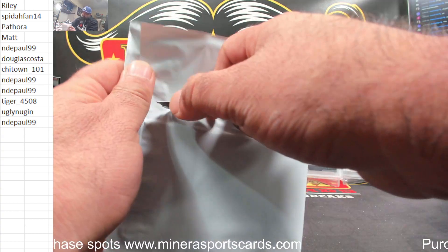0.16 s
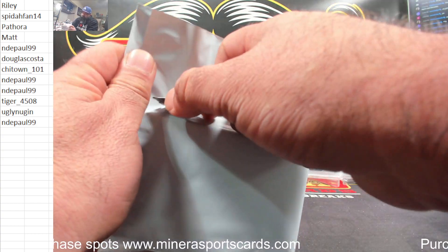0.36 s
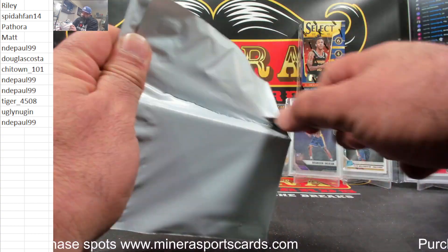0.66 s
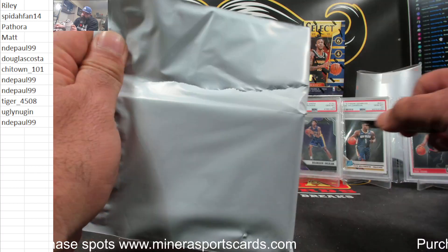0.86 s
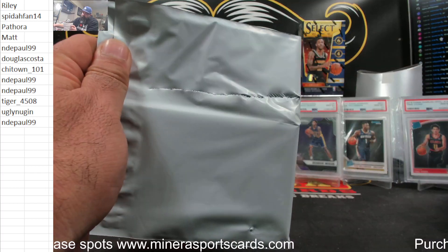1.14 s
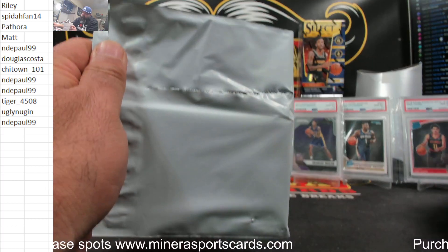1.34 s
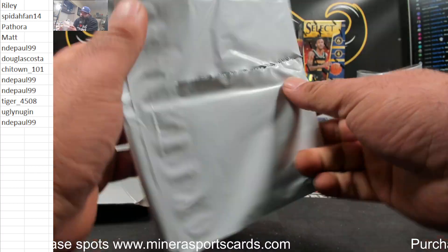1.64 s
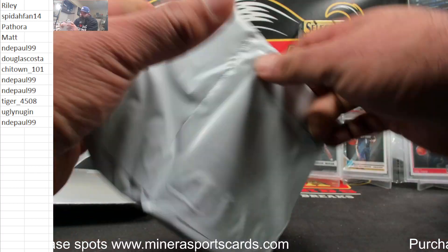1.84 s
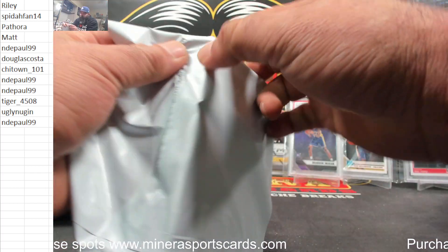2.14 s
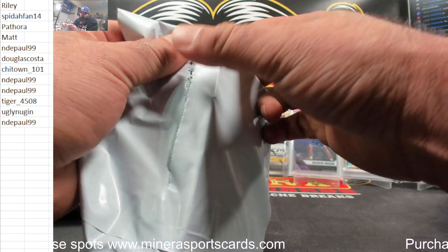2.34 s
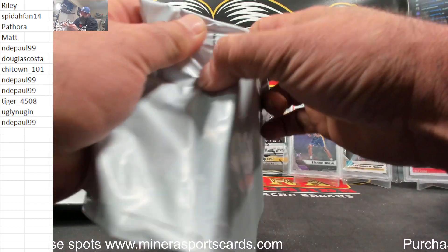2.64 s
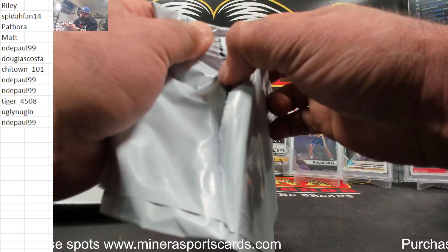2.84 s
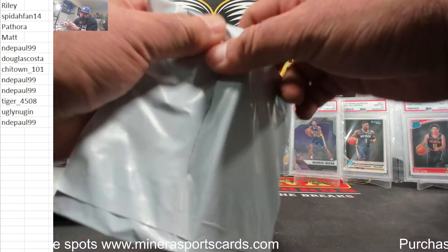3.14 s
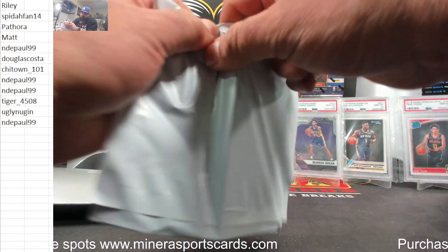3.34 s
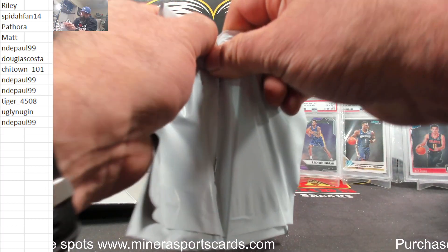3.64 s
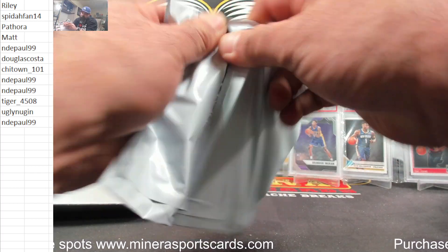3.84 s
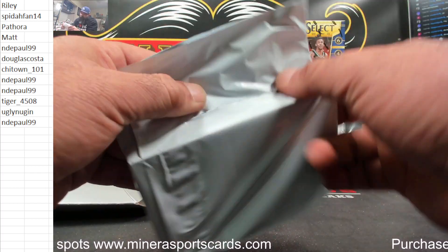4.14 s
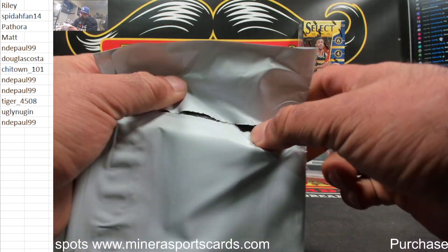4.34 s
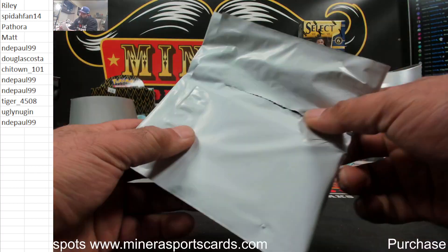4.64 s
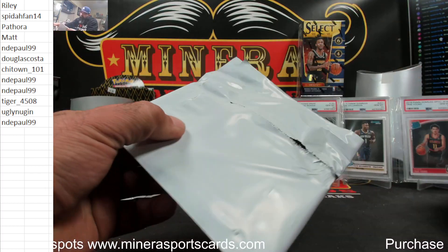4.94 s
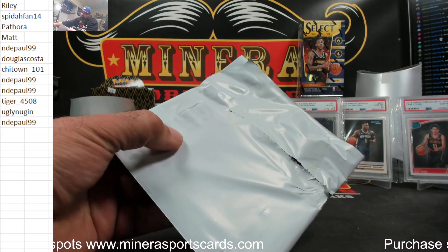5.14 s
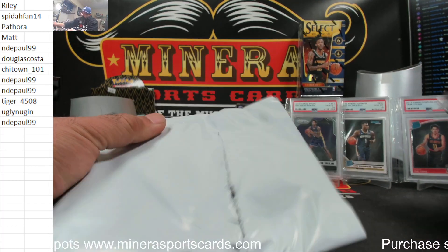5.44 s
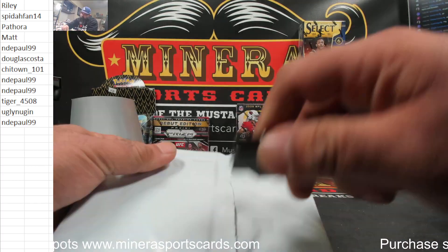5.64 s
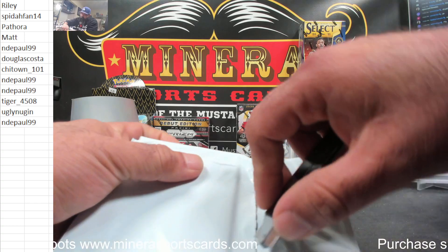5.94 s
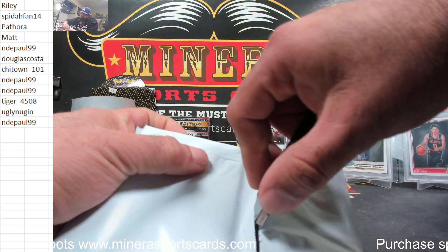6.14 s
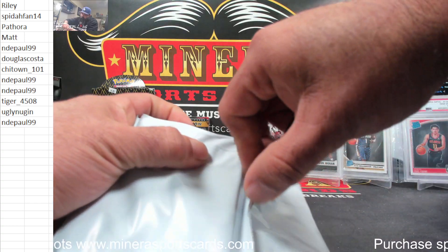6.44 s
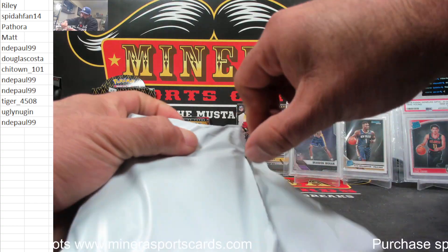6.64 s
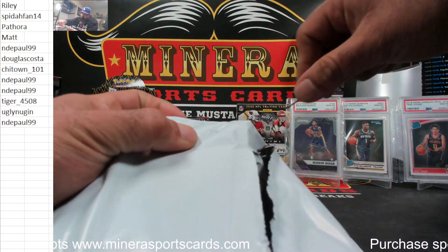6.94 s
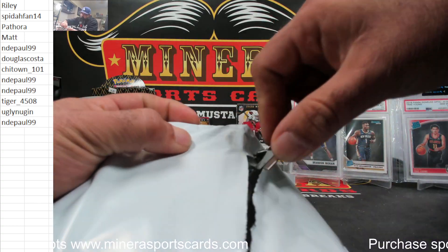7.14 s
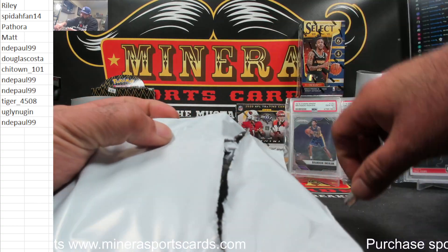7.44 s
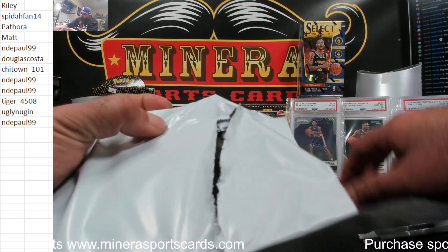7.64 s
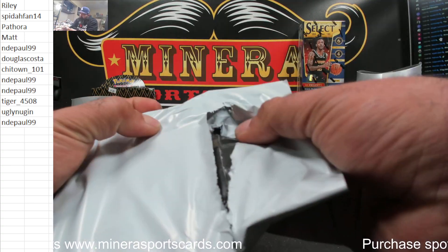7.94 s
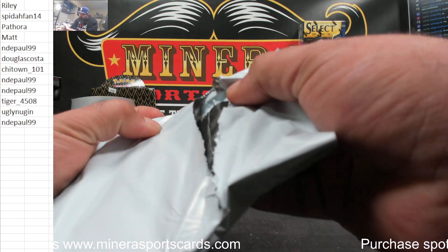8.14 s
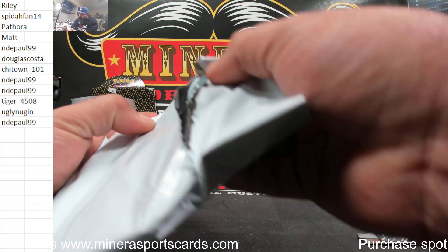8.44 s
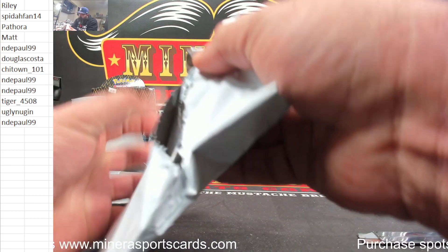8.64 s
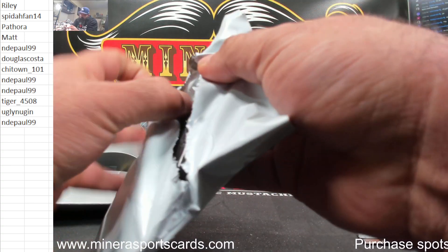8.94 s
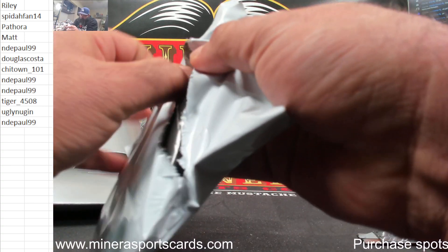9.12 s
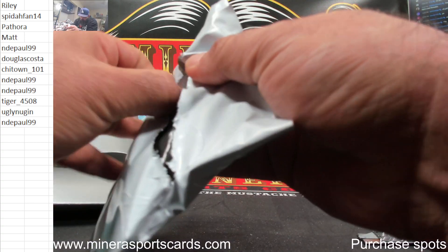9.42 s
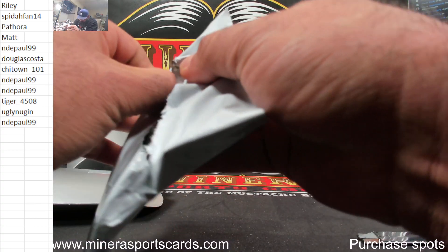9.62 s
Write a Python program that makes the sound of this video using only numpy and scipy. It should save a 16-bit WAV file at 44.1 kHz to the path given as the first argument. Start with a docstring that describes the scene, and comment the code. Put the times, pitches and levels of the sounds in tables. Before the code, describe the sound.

Hands pull and crumple a plastic parcel bag close up, crackling brightly, then ripping loudly, with low desk thumps over quiet room hum.

```python
"""Sharp snaps of creasing plastic over a dense crinkle: a mailer is pulled, torn and crumpled by hand in a small room.
Snaps are noise bursts rung through panel resonances, with early echoes, a rustle and a room tail; the crinkle
is thousands of tiny bursts under the squeezes of the hand, and a finger squeaks once on the film.
The parcel knocks the desk, heard as decaying modes, a thud and a boom; the desk sways and carries a low
wavering tone to the microphone. Behind it lie mains hum (sines) and fan noise (filtered noise)."""
import sys
import numpy as np
from scipy import signal
from scipy.fft import rfft, irfft, next_fast_len
from scipy.io import wavfile
from scipy.ndimage import uniform_filter1d, map_coordinates

SR = 44100
rng = np.random.default_rng(int(sys.argv[2]) if len(sys.argv) > 2 else 0)


def materialize(psi):
    """Save the field psi as 16-bit PCM at rate SR to the path in sys.argv[1].

    A 1-D psi becomes a single channel; in a 2-D psi each row is a channel.
    """
    bounded = np.clip(np.atleast_2d(psi).T, -1, 1)
    quanta = np.round(bounded * 32767).astype(np.int16)
    wavfile.write(sys.argv[1], SR, quanta)


N = 431298

# Creases that snap: start_s, peak_db (of the direct burst), pitch_hz
CREASE_SNAPS = [(0.3536, -23.5, 6100), (0.4381, -28, 3940), (0.5592, -17, 4430), (0.588, -19, 4840),
                (0.7201, -10.5, 5400), (0.957, -34, 4900), (1.1744, -39, 4020), (1.283, -10, 2600),
                (1.296, -7, 4770), (1.3834, -19.5, 2250), (1.4397, -24, 2090), (1.5421, -25.5, 2330),
                (2.0518, -19, 7200), (2.1264, -18, 4630), (2.4554, -25, 3550), (2.515, -17.5, 6900),
                (2.6147, -24.5, 3650), (2.637, -18.5, 6760), (2.6893, -25, 4270), (2.755, -20, 2770),
                (2.9237, -22, 5270), (2.9854, -30.5, 5470), (3.0169, -23, 7100), (3.0354, -19, 4200),
                (3.165, -29, 1720), (3.1942, -17.5, 7400), (3.284, -20.5, 6800), (3.739, -24.5, 5350),
                (3.837, -21, 6100), (3.917, -19, 7500), (3.9838, -23, 6500), (4.129, -22, 7740),
                (4.146, -11.5, 4700), (4.6705, -16.5, 6850), (4.798, -22.5, 7750), (5.0123, -20.5, 5030),
                (5.226, -29.5, 5730), (5.384, -23, 5230), (5.708, -34, 2140), (5.9005, -26, 1920),
                (6.0788, -30, 2100), (6.163, -35, 1450), (6.2335, -31.5, 1740), (6.301, -20.5, 4460),
                (6.336, -28, 1550), (6.4297, -26, 1700), (6.4408, -24, 1600), (6.4793, -20, 1550),
                (6.4931, -13.5, 1840), (6.5969, -21.5, 3660), (6.6534, -3, 1490), (6.6601, -9, 3970),
                (6.6982, 3, 3240), (6.9724, -32.5, 2100), (7.1064, -31, 3900), (7.2504, -26.5, 4250),
                (7.3733, -30.5, 1280), (7.531, -20.5, 4600), (7.59, -11.5, 2400), (7.686, -5, 5900),
                (7.805, -22, 6840), (7.8466, -16, 3900), (7.9907, -20, 1600), (8.0414, -32, 1192),
                (8.086, -27, 2500), (8.3618, -30, 1241), (8.4731, -19, 3400), (8.5668, -19.5, 2840),
                (8.7087, -25, 1485), (8.7343, -19.5, 2570), (8.8438, -27.5, 1400), (9.014, -31, 3560),
                (9.03, -26, 3550), (9.0913, -24, 4730), (9.196, -30, 2170), (9.3647, -24, 3680),
                (9.4814, -20, 1900), (9.614, -26, 1280), (9.7423, -25.5, 3650)]
# Early wall echoes of a snap: delay_s, level_db (against the snap)
WALL_ECHOES = [(.0065, -9), (.024, -15)]
# Decay of the room: frequency_hz, t60_s
ROOM_DECAY = [(500, 0.014), (3000, 0.18), (12000, 0.15)]
# Spectral colour of the plastic film: frequency_hz, relative_density_db (per Hz)
FILM_COLOUR = [(880, -7.5), (1500, -8.5), (1610, -5), (2780, -10.5), (3800, -5.5), (4630, -8), (8500, -5),
               (15600, -22.5)]
# Squeezes and pulls of the hand: start_s, hold_s, crinkle_db
HAND_SQUEEZES = [(0.23, 0.013, -55), (0.36, 0.042, -49), (0.46, 0.053, -39.5), (0.56, 0.053, -36.5),
                 (0.73, 0.011, -38.5), (1.29, 0.035, -34), (1.39, 0.063, -46.5), (1.55, 0.045, -46),
                 (1.7, 0.049, -54.5), (1.8, 0.14, -44.5), (1.9, 0.081, -44.5), (2.06, 0.078, -50),
                 (2.25, 0.19, -57), (2.51, 0.17, -45), (3.03, 0.041, -42.5), (3.18, 0.13, -45),
                 (3.35, 0.18, -47.5), (3.76, 0.28, -42), (4.14, 0.11, -42), (4.41, 0.0057, -38.5),
                 (4.48, 0.09, -53.5), (4.66, 0.011, -41.5), (5.02, .02, -52.5), (5.22, 0.18, -58),
                 (5.39, 0.045, -46.5), (5.55, 0.019, -55), (5.71, 0.06, -55.5), (6.05, 0.096, -58),
                 (6.3, 0.035, -43.5), (6.43, 0.12, -43), (6.665, 0.047, -27), (7.06, 0.094, -54.5),
                 (7.23, 0.018, -45), (7.38, 0.021, -55), (7.595, 0.0096, -33), (7.7, 0.019, -38),
                 (7.84, 0.028, -35), (7.98, 0.086, -40), (8.37, 0.17, -50.5), (8.48, 0.15, -46.5),
                 (8.7, 0.066, -42), (8.84, 0.027, -50.5), (9.03, 0.063, -43), (9.15, 0.036, -44),
                 (9.31, 0.18, -44.5), (9.62, 0.069, -51), (9.75, 0.023, -42.5)]
# Colour of the crinkle: time_s, large_panels_db (against crinkle), muffled_share (0-1)
CRINKLE_FLEX = [(0, -12, 0), (.8, -1.5, 0), (1.3, -22, 0), (2.6, -11.5, 0), (4.4, -10, 0), (5.4, -44, 0.23),
                (6.5, -6.5, 0.69), (7.3, -23.5, 0), (8.2, -2, 0.69), (9.05, -8, 0.4), (9.78, -8.5, 0.38)]
# A finger slips on the film: start_s, end_s, pitch_hz, level_db
FINGER_SQUEAK = (3.39, 3.49, 1450, -50)
# Parcel hits the desk: start_s, level_db (whole knock), boom_db, thud_db (both within the knock)
DESK_KNOCKS = [(1.283, -15.5, -12, -11), (5.011, -28.5, 11, -13), (6.696, -43, 21, 1.5),
               (7.588, -12.5, -8, -8.5), (7.682, -12.5, -3, -13.5)]
# Ringing modes of the desk: frequency_hz, level_db (within the ring), t60_s
DESK_MODES = [(95.3, 3.5, 0.18), (148, -3, 0.22), (217, 0.5, 0.12), (273.4, -14.5, 0.32),
              (306.5, -22.5, 0.96), (388, -20, 1)]
# Low tone carried by the desk: time_s, level_db
TONE_LEVEL = [(0.15, -44), (0.6, -44), (1.47, -31.5), (1.65, -46), (1.85, -20.5), (2.51, -37), (3.17, -30),
              (3.89, -49), (4.6, -31), (4.84, -28.5), (5.9, -21.5), (6.23, -43), (6.6, -29), (6.93, -18.5),
              (7.6, -26), (7.93, -16.5), (8.73, -25.5), (9.3, -20.5), (9.69, -34)]
# Slow sway of the desk: time_s, level_db
SWAY_LEVEL = [(0.15, -21), (0.45, -24.5), (1.85, -27), (3.89, -33), (5.06, -31.5), (6.2, -21), (6.6, -22),
              (6.77, -7), (7.0, -28), (7.71, -16.5), (8.73, -34), (9.24, -15.5), (9.5, -27.5)]
# Shoves that swell the boom band: start_s, hold_s, level_db
DESK_SHOVES = [(0.55, 0.2, -33.5), (1.3, 0.079, -27), (2.3, 0.17, -37), (5.03, 0.15, -37.5),
               (6.77, .2, -24), (7.6, 0.14, -25), (8.7, 0.31, -48)]
# Mains hum partials: frequency_hz, level_db
MAINS_HUM = [(60, -39), (120, -47.5), (240, -69)]
# Spectral colour of the fan: frequency_hz, relative_density_db (per Hz)
FAN_COLOUR = [(47, -27), (80, -4), (102, -21), (136, -10), (170, -19.5), (231, -14.5), (571, -28),
              (889, -26.5), (1160, -31), (1440, -26), (1760, -36.5), (6930, -48), (15700, -51.5)]

RUSTLE_DB = -4  # energy of the rustle after a snap, against the snap
SQUEEZE_SWELL_S, SQUEEZE_FADE_S = 0.034, 0.087  # times to swell and fade by 20 dB
HELD_BAG_DB = -71  # crinkle of the bag merely held
MUFFLE_HZ, PATCHY_DB = 4460, 2
SHOVE_SWELL_S, SHOVE_FADE_S, BOOM_IDLE_DB = 0.17, 0.67, -51  # times are per 20 dB
TOP_HZ = 15900  # top of the sound's band


def snaps():
    """Each crease buckles in a short burst coloured by its panel; the film rustles after it and the room answers."""
    out, t = np.zeros(N), np.arange(SR // 50) / SR
    for start_s, peak_db, hz in CREASE_SNAPS:
        burst = rng.standard_normal(len(t)) * amp(-60 * t / .008)
        burst[0] = 3  # the buckle itself is one sharp push
        second_hz = hz * 2 ** rng.uniform(-.9, 1.3)  # a second panel mode

        def panel(f):
            """The film's broad colour and two panel modes, thinned below the pitch."""
            film = 0.48 * amp(along(FILM_COLOUR, f)) * hump(f, hz, 2.6)
            modes = 0.75 * hump(f, hz, 0.22) + 0.35 * hump(f, second_hz, 0.12)
            low_cut = 1j * f / (.35 * hz + 1j * f)
            return (film + modes) * low_cut

        burst = filtered(burst, panel)
        burst *= amp(peak_db) / np.abs(burst).max()
        rustle = filtered(tail(), panel)
        rustle *= amp(RUSTLE_DB) * np.linalg.norm(burst) / np.linalg.norm(rustle)
        add(out, start_s, burst)
        for delay_s, echo_db in WALL_ECHOES:
            add(out, start_s + delay_s, amp(echo_db) * burst)
        add(out, start_s + 0.0025, rustle)
    return out


def crinkle():
    """Many tiny creases: millisecond bursts of scattered size and colour, clumped, on the rub of the film."""
    flex_db, muffled = curves(CRINKLE_FLEX)
    muffled = np.clip(muffled, 0, 1)
    count, length = 3200, 160  # bursts, samples per burst
    draw = rng.random((count, 3))
    at = (draw[:, 0] * (N - length)).astype(int)
    t = np.arange(length) / SR
    hz = 2500 * amp(11.56 * draw[:, 1:2])
    size = amp(-3.5 * np.log(draw[:, 2:3] + .015))  # few large creases, many small
    grit = rng.standard_normal((count, length))
    bursts = size * (grit + 1.5 * np.sin(2 * np.pi * hz * t)) * amp(-60 * t / 0.0035)
    places = at[:, None] + np.arange(length)
    grains = np.bincount(places.ravel(), bursts.ravel(), N)

    clumped = unit(grains) * amp(3 * wobble(25))
    film = clumped + .45 * rng.standard_normal(N)
    bright = filtered(patchy(film, PATCHY_DB), lambda f: amp(along(FILM_COLOUR, f)))
    dull = filtered(bright, lambda f: 1 / (1 + (f / MUFFLE_HZ) ** 2))
    bright = (1 - muffled) * bright + muffled * dull
    # large panels of the bag flex with the hand
    body = filtered(0.036 * film + rng.standard_normal(N), lambda f: hump(f, 875, 1.41) ** 2)
    hand = swells(HAND_SQUEEZES, SQUEEZE_SWELL_S, SQUEEZE_FADE_S, HELD_BAG_DB)
    close = hand * (unit(bright) + amp(flex_db) * unit(body))
    return close + amp(-2.5) * signal.fftconvolve(close, tail())[:N]


def squeak():
    """A short run of finger slips, as uneven noise, through one panel resonance."""
    start_s, end_s, hz, db = FINGER_SQUEAK
    slips = rng.standard_normal(N) * amp(2.4 * wobble(120))
    t = np.arange(N) / SR
    gate = np.clip(np.minimum((t - start_s) / 0.0052, (end_s - t) / 0.049), 0, 1)
    return amp(db) * gate * unit(filtered(slips, lambda f: hump(f, hz, 0.11) ** 2))


def knocks():
    """Every knock is a dull thud that rings the desk's modes at slightly new strengths, with a low boom."""
    out, t = np.zeros(N), np.arange(SR) / SR
    for start_s, db, boom_db, thud_db in DESK_KNOCKS:
        ring = np.zeros(len(t))
        for hz, level_db, t60_s in DESK_MODES:
            strength_db = level_db + rng.normal(0, 0.46)
            ring += amp(strength_db - 60 * t / t60_s) * np.sin(2 * np.pi * hz * t)
        thud = unit(filtered(rng.standard_normal(len(t)), lambda f: hump(f, 344, 0.31) ** 2))
        thud *= amp(-60 * t / 0.13) + amp(-19.5 - 60 * t / 3.14)  # fast drop, faint slow rest
        # the bag's air pocket falls in pitch
        pocket_hz = 355 + 130 * np.exp(-t / 0.0097)
        thud += 2.44 * amp(-60 * t / 0.14) * np.sin(2 * np.pi * np.cumsum(pocket_hz) / SR)
        boom = amp(boom_db - 60 * t / .5) * np.sin(2 * np.pi * 69 * t)
        onset = 1 - np.exp(-t / 0.0042)
        add(out, start_s, amp(db) * (amp(-2.5) * ring + amp(thud_db) * thud + boom) * onset)
    return out


def desk():
    """The desk carries a low wavering tone; slow sway and a boom band, both filtered noise, follow the handling."""
    (tone_db,), (sway_db,) = curves(TONE_LEVEL), curves(SWAY_LEVEL)
    tone_hz = 44 + 0.597 * wobble(4)
    tone = np.sqrt(2) * np.sin(2 * np.pi * np.cumsum(tone_hz) / SR)
    tone *= amp(tone_db + 0.3 * wobble(13.0))
    sway = filtered(rng.standard_normal(N), lambda f: hump(f, 12.0, 6.3) / (1 + (f / 30) ** 6))
    boom = filtered(rng.standard_normal(N), lambda f: hump(f, 67.0, 0.2) ** 2)
    shove = swells(DESK_SHOVES, SHOVE_SWELL_S, SHOVE_FADE_S, BOOM_IDLE_DB)
    return tone + amp(sway_db) * unit(sway) + shove * unit(boom)


def room_tone():
    """Fan noise and mains hum run throughout, each drifting gently in level."""
    t = np.arange(N) / SR
    hum = np.zeros(N)
    for hz, db in MAINS_HUM:
        level = np.sqrt(2) * amp(db + 1.44 * wobble(1.55))
        hum += level * np.sin(2 * np.pi * (hz * t + rng.random()))
    fan = filtered(rng.standard_normal(N), lambda f: amp(along(FAN_COLOUR, f)))
    return hum + amp(-46.5 + 1.66 * wobble(6.8)) * unit(fan)


def tail():
    """A fresh room answer of energy 1; each frequency dies at its own speed."""
    hz, t, z = signal.stft(rng.standard_normal(SR // 3), SR, nperseg=256)
    decay = amp(-60 * t / along(ROOM_DECAY, hz)[:, None])
    answer = signal.istft(z * decay, SR, nperseg=256)[1]
    return answer / np.linalg.norm(answer)


def swells(rows, swell_s, fade_s, idle_db):
    """Gain of gestures that swell, hold and fade, summed as power over an idle level."""
    t = np.arange(0, N, 64) / SR
    power = amp(2 * idle_db)  # doubled dB turns amplitude into power
    for start_s, hold_s, db in rows:
        before = (start_s - t) / swell_s
        after = (t - start_s - hold_s) / fade_s
        power = power + amp(2 * db - 40 * np.maximum(0, np.maximum(before, after)))
    return np.interp(np.arange(N) / SR, t, np.sqrt(power))


def patchy(x, depth_db):
    """Random patches of time and frequency grow louder or softer."""
    z = signal.stft(x, nperseg=256)[2]
    field = uniform_filter1d(rng.standard_normal(z.shape), size=6, axis=0)
    field = uniform_filter1d(field, size=12, axis=1)
    return signal.istft(z * amp(depth_db * unit(field)), nperseg=256)[1][:N]


def hump(f, hz, width):
    """A causal resonance of relative width."""
    return 1j * f * hz * width / (hz * hz - f * f + 1j * f * hz * width)


def filtered(x, response):
    """x shaped by a response of frequency."""
    m = next_fast_len(len(x) + 4096)
    return irfft(rfft(x, m) * response(np.fft.rfftfreq(m, 1 / SR)), m)[:len(x)]


def wobble(rate):
    """A smooth random curve, rate knots a second."""
    knots = rng.standard_normal(int(N * rate / SR) + 4)
    return map_coordinates(knots, [np.arange(N) * rate / SR])


def curves(rows):
    """One value per sample for each column after the time."""
    s, *cols = np.transpose(rows)
    return [np.interp(np.arange(N) / SR, s, c) for c in cols]


def along(points, hz):
    """Read (frequency_hz, value) points on a log frequency axis."""
    f, v = np.transpose(points)
    return np.interp(np.log(hz + 1), np.log(f + 1), v)


def amp(db):
    """Decibels to amplitude."""
    return 10 ** (np.asarray(db) / 20)


def unit(x):
    """x scaled to an RMS of 1."""
    return x / np.sqrt(np.mean(x ** 2) + 1e-20)


def add(out, s, x):
    """Mix x into out at time s."""
    at = round(s * SR)
    out[at:at + len(x)] += x[:len(out) - at]


def scene():
    """Mix the bag, the desk and the room into one channel."""
    return (snaps() + crinkle() + squeak() + knocks() + desk() + room_tone())[None]


def record(dry):
    """The loudest peaks are rounded off and the band ends at TOP_HZ."""
    rounded = dry[0] / (1 + np.abs(dry[0] / .93) ** 6) ** (1 / 6)
    return filtered(rounded, lambda hz: hz < TOP_HZ)[None]


dry = scene()
out = record(dry)
materialize(out)
```